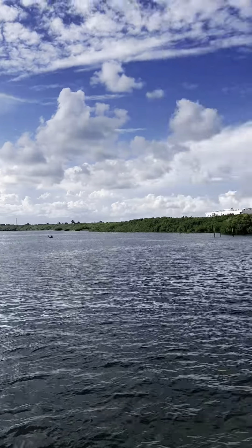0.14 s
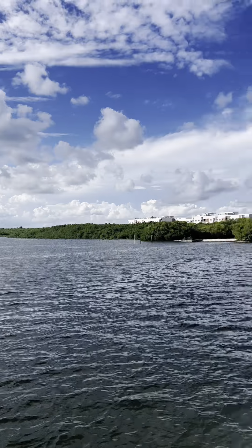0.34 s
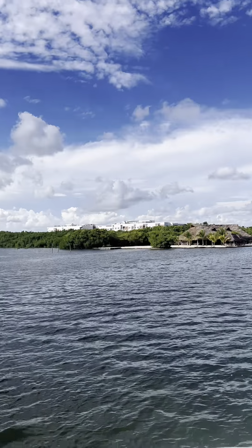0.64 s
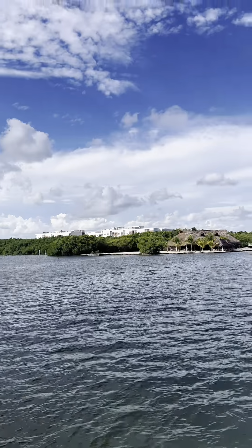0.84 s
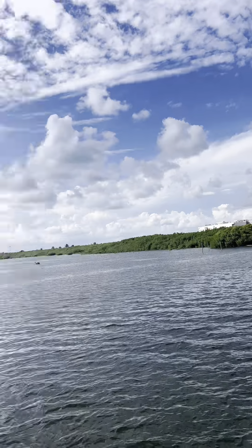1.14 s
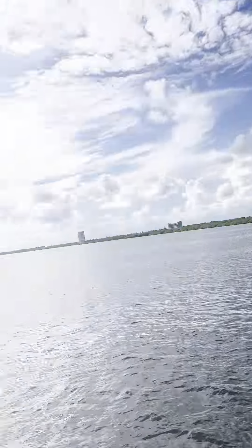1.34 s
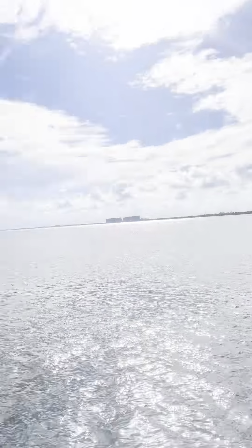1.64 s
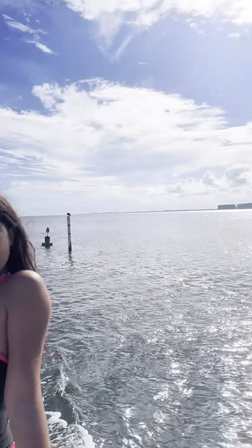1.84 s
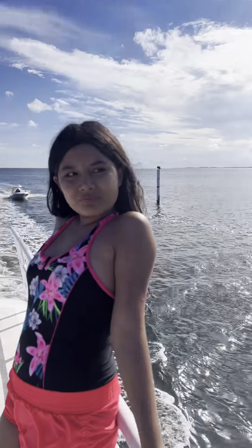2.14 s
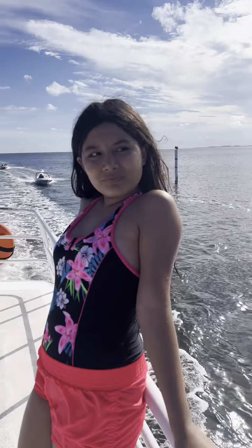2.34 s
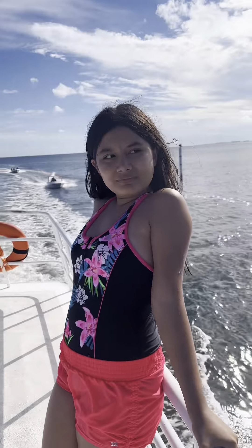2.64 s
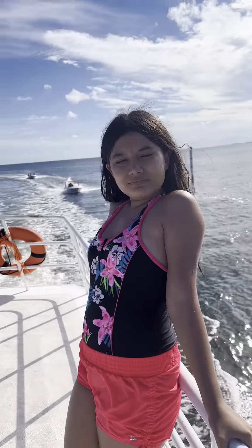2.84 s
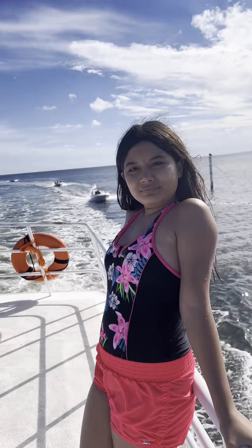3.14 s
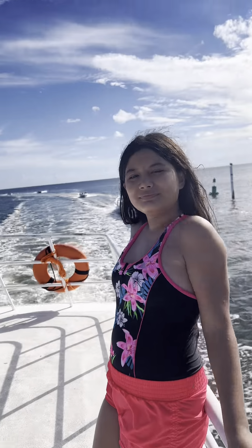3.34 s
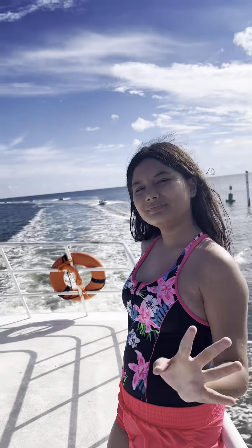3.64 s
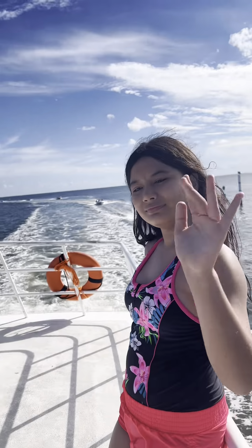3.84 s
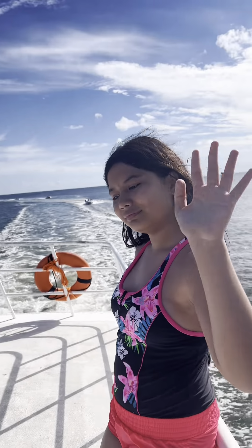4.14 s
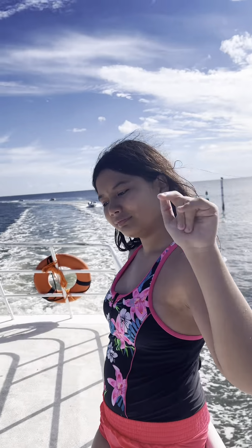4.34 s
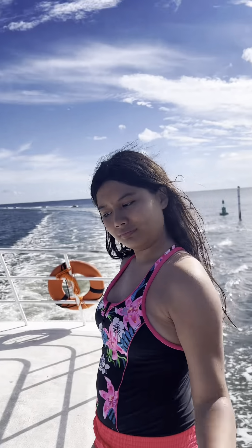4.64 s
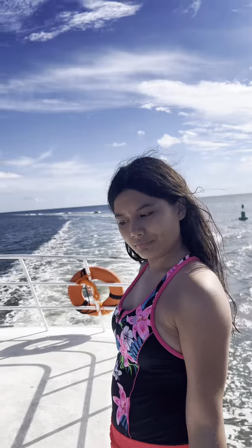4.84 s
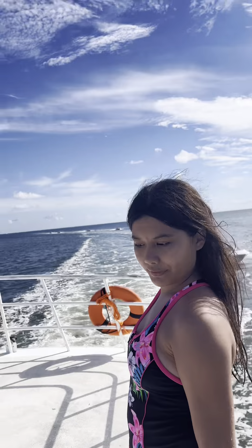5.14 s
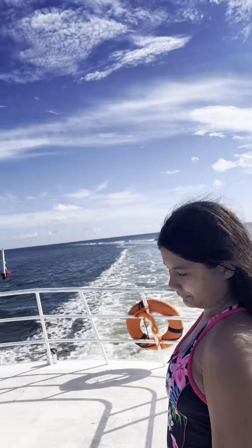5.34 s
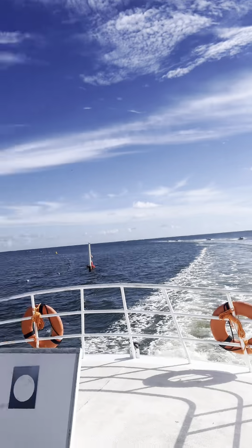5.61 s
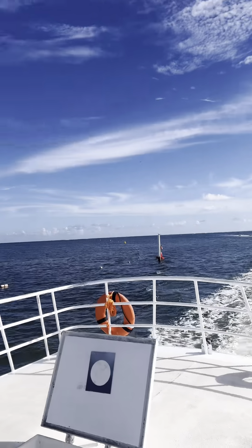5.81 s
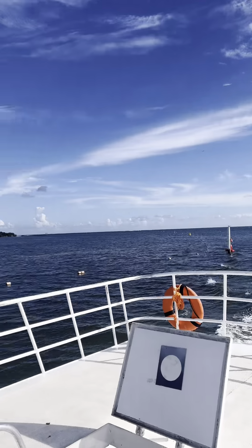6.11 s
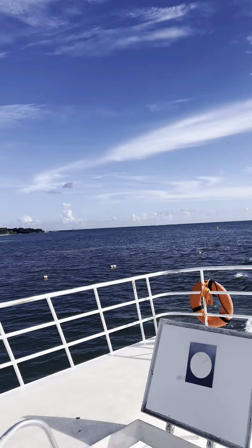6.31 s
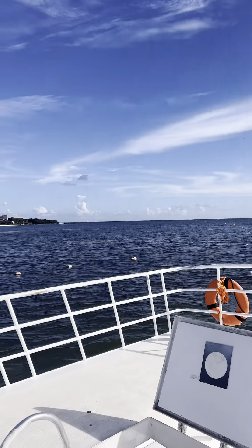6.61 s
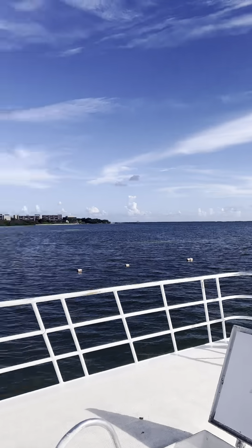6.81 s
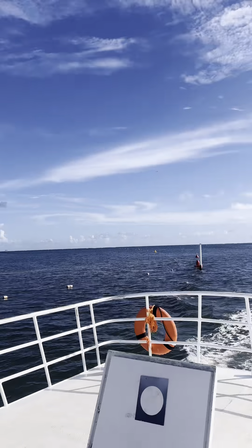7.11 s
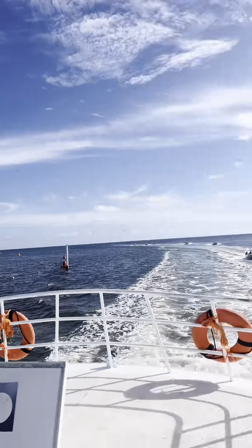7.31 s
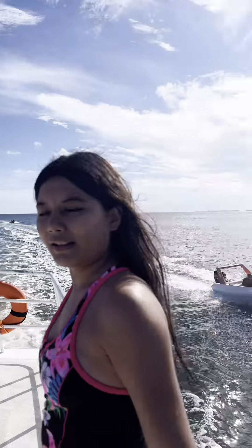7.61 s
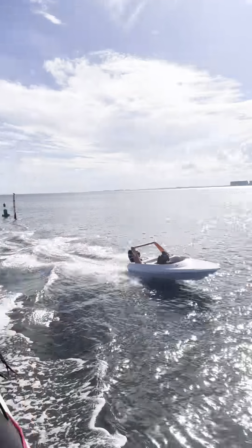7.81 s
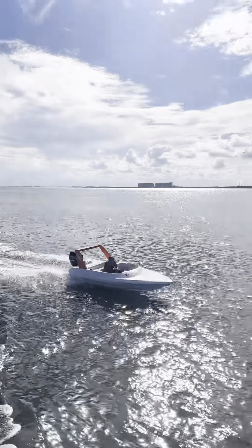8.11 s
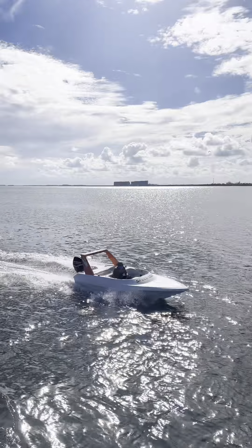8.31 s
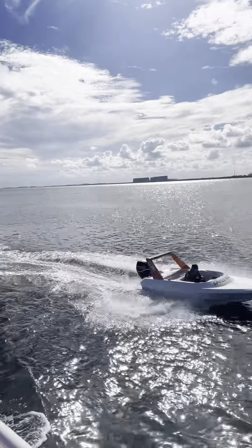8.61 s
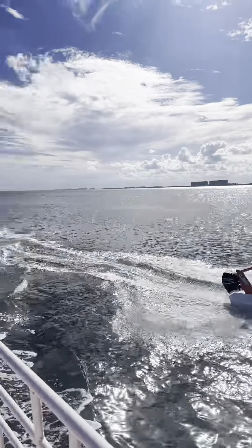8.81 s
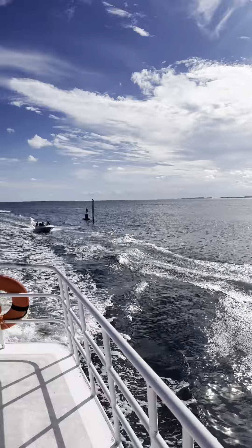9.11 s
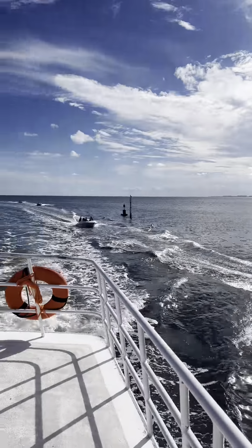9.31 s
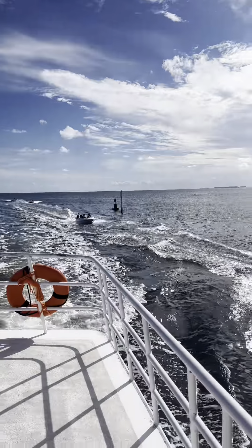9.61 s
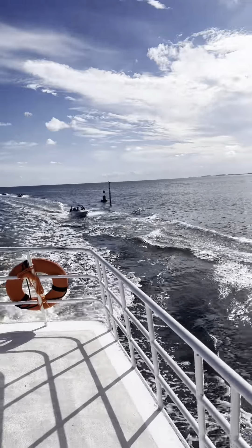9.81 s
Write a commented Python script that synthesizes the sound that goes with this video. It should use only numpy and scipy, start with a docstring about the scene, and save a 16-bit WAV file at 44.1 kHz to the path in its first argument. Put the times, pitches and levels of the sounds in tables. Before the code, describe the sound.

Open deck of a moving boat, heard through a wind-buffeted stereo microphone. Two low engines, almost in step, make a deep throbbing hum that swells and drops unevenly, sometimes abruptly. From 0.4 to 1.2 s a fluttering gust brings a cluster of soft pops; the water is still faint. Around 2 s the churning wake and fine spray rise. Hard low wind thumps hit at 2.5 and 3.4-3.6 s, smaller ones at 4.3-4.9 s, then a run of flutters and pops at 5.2-5.9 s. A splash bursts at 6.6 s, and a strong gust pops at 7.1-7.2 s. From about 7.5 s a small motorboat draws alongside with a rushing drone, slapping through a wave at 8.2 s. Water becomes loud, bright and hissing, and the engines strengthen. A heavy wind pop hits at 9.3 s, with another low gust near 9.9 s.

```python
"""Open deck of a moving boat. Two engines a little apart in speed, summed as pairs of sines, beat together.
The wake churns and sprays astern: shaped noise. Gusts rumble and flutter on the microphone ports: lumpy noise
and short rings, with single eddies popping out. A small motor boat, rush and drone in noise, draws alongside.
The engines swell and sink, at times abruptly, and the water grows louder toward the end."""
import sys
import numpy as np
from scipy import signal
from scipy.io import wavfile
from scipy.ndimage import uniform_filter1d

SR = 44100
rng = np.random.default_rng(int(sys.argv[2]) if len(sys.argv) > 2 else 0)


def transcribe(u):
    """Save the signal u as a 16-bit wav file named by the first command-line argument.

    u: samples, shape (n,) or (channels, n), limited to [-1, 1]; the rate is SR.
    q: integer samples, one column per channel.
    """
    v = np.clip(np.atleast_2d(u).T, -1, 1)
    q = np.round(v * 32767).astype(np.int16)
    wavfile.write(sys.argv[1], SR, q)


N = 439236

# Shaft speeds. The columns are first engine and second engine in Hz.
SHAFT_HZ = (28.79, 29.17)
IN_STEP_S = 5.98   # both shafts pass zero phase here, but for the second engine's lead
ENGINE_WAVER_DB = 2.03
# Tones of the engines. Each row: multiple of shaft speed, gain of first engine in dB, of second in dB.
ENGINE_ORDERS = [(2, 2.5, 4), (3, -11.5, -20.5), (4, -2.5, -3), (6, -7.5, -22), (7, 1, -24),
                 (12, -12, -19.5)]
# Engines as heard. Each row: time in seconds, gain of second order in dB, of third and fourth orders in dB.
ENGINE_GAINS = [(0.0, -12, -12.5), (0.33, -16.5, -12.5), (0.71, -17.5, -16), (0.78, -27, -30),
                (1.33, -17, -26), (1.55, -29, -25), (1.8, -18, -22), (2.1, -15.5, -15.5),
                (2.5, -14.5, -13.5), (2.99, -20, -16.5), (3.54, -18, -14), (3.61, -23.5, -28),
                (4.45, -22.5, -22), (4.8, -19.5, -28), (5.64, -26.5, -30.5), (6.31, -23.5, -27),
                (6.64, -22.5, -17), (6.97, -26, -30), (7.3, -18, -22.5), (7.64, -16.5, -20),
                (7.84, -18, -20.5), (7.9, -22, -7.5), (7.98, -30, -23), (8.4, -19, -16.5),
                (8.96, -15, -11.5), (9.3, -12.5, -16), (9.96, -20, -13.5)]
# Higher engine orders as heard. Each row: time in seconds, gain in dB.
UPPER_ORDER_GAINS = [(0, -31.5), (1.7, -37), (2.2, -27), (3.5, -28.5), (4.2, -35.5), (6, -38.5),
                     (7.6, -35.5), (8, -28), (9.96, -25.5)]
# The second engine hunts a little. Each row: time in seconds, lead in shaft turns.
SECOND_ENGINE_LEAD = [(0.15, -.02), (1.4, -.015), (2.6, .03), (3.9, .04), (5.3, 0), (6.7, -.035), (7.95, 0)]
# Bass balance. Each row: time in seconds, left minus right in dB.
BASS_LEAN = [(0, -2.8), (4.8, -2.4), (5.4, 0)]

# Steady wind on the ports. Each row: time in seconds, then gains in dB of rumble, shared flutter and
# flutter that differs between the ports.
BREEZE = [(0, -29, -43.5, -38), (0.41, -14, -51, -26.5), (0.85, -28.5, -36, -45.5), (1.74, -31.5, -51, -50),
          (2.49, -22.5, -47, -55), (3.15, -25.5, -59, -41), (4.5, -27.5, -41.5, -31),
          (6.05, -29.5, -40.5, -36.5), (6.99, -26.5, -48, -29), (7.3, -32, -73, -38),
          (8.4, -25.5, -39, -42), (9.16, -19, -51, -48), (9.45, -27.5, -62, -22.5), (9.96, -36, -30, -32)]
# Gusts. Each row: peak time, rise and fall in seconds, then the same three gains in dB.
GUSTS = [(0.67, 0.49, 0.15, -12, -16.5, -24), (0.97, 0.22, 0.26, -25, -33, -43),
         (1.19, 0.11, 0.07, -31, -26, -26.5), (1.5, 0.034, 0.13, -16.5, -35.5, -44),
         (2.55, 0.12, 0.078, -13, -36, -47), (2.86, 0.45, 0.3, -15, -34, -36),
         (3.27, 0.14, 0.14, -13.5, -34, -47), (3.38, 0.016, 0.089, -10, -26.5, -32),
         (3.49, 0.12, 0.03, -7.5, -34, -42), (3.546, 0.023, 0.021, -3.5, -40, -23),
         (3.63, 0.15, 0.24, -27, -32.5, -35), (3.96, 0.26, 0.06, -19.5, -34, -32),
         (4.1, 0.11, 0.1, -23.5, -34, -32), (4.3, 0.078, 0.051, -15.5, -33, -33),
         (4.59, 0.068, 0.038, -22.5, -33.5, -39), (4.86, 0.11, 0.13, -15.5, -28, -20.5),
         (5.19, 0.09, 0.077, -30, -31, -37), (5.35, 0.046, 0.18, -46, -48, -29),
         (5.78, 0.72, 0.41, -23.5, -28.5, -49), (6.63, 0.11, 0.77, -24, -32.5, -49),
         (7.08, 0.026, 0.29, -17, -27.5, -38), (7.19, 0.094, 0.048, -24, -16, -42),
         (7.85, 0.61, 1, -16.5, -57, -28), (8.1, 0.15, 0.094, -24, -29.5, -24),
         (9.22, 0.14, 0.31, -9.5, -28.5, -15.5), (9.74, 0.37, 0.1, -17.5, -35, -35),
         (9.88, 0.063, 0.12, -6.5, -21, -11)]
# Wind spectra. Each row: frequency in Hz, relative density in dB per Hz.
RUMBLE_SPECTRUM = [(30, -35), (45, -13), (80, -4.5), (150, -8), (250, -11.5), (400, -20), (700, -43.5)]
FLUTTER_SPECTRUM = [(150, -33), (300, -1), (500, 15), (800, -3.5), (1200, -15.5), (2000, -48), (3000, -63)]
APART_SPECTRUM = [(80, -13), (180, -1), (300, 3.5), (600, 1), (900, -10), (1400, -27), (2500, -27)]
# Ring added to the differing flutter. Each row: time in seconds, gain in dB.
APART_RING_GAINS = [(0, 5), (1.15, -6), (1.3, 17), (1.6, 13), (2.4, 17.5), (3.1, 15.5), (3.4, 7),
                    (4.4, 3.5), (5.0, -1.5), (5.4, -25), (6.95, 10), (7.1, -4)]
APART_RING_HZ, APART_RING_WIDTH_HZ = 820, 260

# The wake. Each row: time in seconds, churn gain in dB, spray gain in dB.
WAKE = [(0.0, -53, -58.5), (0.69, -49.5, -61), (1.14, -49, -58), (2.25, -41.5, -49), (3.16, -41.5, -49.5),
        (3.66, -41.5, -53.5), (4.05, -39, -51.5), (4.94, -42, -51.5), (5.85, -43, -51),
        (6.38, -39.5, -44.5), (6.57, -41.5, -49), (7.1, -40, -47.5), (7.52, -39.5, -42.5),
        (7.68, -38.5, -45.5), (8.3, -35, -37), (8.85, -36.5, -37), (9.96, -33.5, -39)]
# Waves splash up. Each row: peak time, rise and fall in seconds, churn gain in dB, spray gain in dB.
SPLASHES = [(3.69, 0.038, 0.079, -36, -55), (5.38, 0.76, 0.9, -39, -47), (5.96, .2, 0.49, -41, -49),
            (6.625, 0.04, 0.35, -32, -42.5), (7.19, 0.042, 0.45, -38.5, -61),
            (8.07, 0.035, 0.16, -34.5, -45), (8.235, 0.14, 0.043, -32, -34)]
# Water spectra, WIDE for the left-right part. Each row: frequency in Hz, relative density in dB per Hz.
CHURN_SPECTRUM = [(400, -11), (600, -1), (900, 3), (1300, -4), (1700, -4), (2500, -10), (3200, -10),
                  (4500, -20), (5600, -37)]
CHURN_WIDE_SPECTRUM = [(600, 13.5), (900, 0), (1300, 2.5), (1900, -25), (2600, 2.5), (4000, -24), (5000, 0),
                       (6000, -51)]
SPRAY_SPECTRUM = [(4400, -9), (5600, -3), (7500, -5.5), (10000, -12), (12000, -13), (14500, -10)]
SPRAY_WIDE_SPECTRUM = [(7000, -26), (8500, -12), (10500, 2), (12300, 0), (15000, 3), (18500, -11)]
CHURN_DB, CHURN_WIDE_DB, SPRAY_WIDE_DB = 3.5, -1.5, -0.5   # added to the gains above
DIP_HZ, DIP_WIDTH_HZ, DIP_SHARE = 4990, 580, 0.52   # the microphone hears less of the water here

# Steady faint hiss. Each row: frequency in Hz, relative density in dB per Hz.
HISS_SPECTRUM = [(3000, -10), (4000, -12), (4800, 4.5), (5600, -11.5), (7000, -19)]
HISS_DB = -54.5

# Strong eddies. Each row: start in seconds, gain of the main puff in dB, pitch in Hz.
EDDIES = [(0.383, -18, 604), (0.497, -18.5, 942), (0.525, -16, 587), (0.557, -9, 860), (0.591, -13, 800),
          (0.644, -16, 900), (0.661, -14.5, 955), (0.721, -11, 940), (0.725, -15.5, 935),
          (0.786, -14.5, 700), (0.812, -14, 895), (0.852, -13.5, 810), (0.915, -21, 850),
          (1.186, -12.5, 940), (2.532, -10, 444), (3.383, -10, 500), (3.39, -12, 1090), (3.393, -11, 690),
          (3.452, -11, 700), (3.499, -10.5, 745), (3.539, -4, 382), (3.655, -17, 810), (4.287, -12.5, 624),
          (4.324, -12.5, 554), (4.572, -11, 220), (4.836, -15, 455), (4.878, -10.5, 520), (5.166, -12, 514),
          (5.191, -9, 665), (5.217, -10, 543), (5.355, -14.5, 546), (5.487, -24, 640), (5.543, -18, 553),
          (5.6, -14, 850), (5.662, -11, 695), (5.694, -14, 600), (5.735, -10.5, 650), (5.774, -9, 550),
          (5.817, -12, 600), (5.835, -12, 650), (7.066, -17, 596), (7.143, -16, 503), (7.176, -7, 620),
          (7.197, -2, 720), (7.242, -17, 600), (8.087, -17, 595), (8.097, -8, 375), (8.211, -10, 920),
          (8.316, -14, 620), (8.323, -9.5, 300), (9.241, -0.5, 744)]
# The sharp front has its full share from FULL_FRONT_HZ up, less below; the push is dull.
FRONT_SHARE, FULL_FRONT_HZ, PUSH_SHARE = 0.3, 950, 0.7

# A small motor boat alongside. Each row: time in seconds, gain in dB; the first gain holds before.
LAUNCH_GAINS = [(7.3, -61), (7.9, -44), (9.0, -39), (9.96, -46)]
# Its rush and its slap. Each row: frequency in Hz, relative density in dB per Hz.
LAUNCH_RUSH_SPECTRUM = [(500, 11), (800, 3.5), (1300, 4.5), (2200, -2), (2800, -6)]
SLAP_SPECTRUM = [(500, 4), (1000, 12), (1800, 11), (2500, 1), (3200, -8)]
# Its droning bands. Each row: frequency in Hz, width in Hz, gain relative to the rush in dB.
LAUNCH_DRONES = [(950, 90, -6), (2180, 70, -3)]
# It slaps through a wave. The columns are peak time, rise and fall in seconds, gain in dB.
SLAP = (8.225, 0.05, 0.09, -24)

SUPPRESS_KNEE = 2.5   # how abruptly the wind suppressor closes
CENTRE_TOP_HZ, WIDE_TOP_HZ = 12550, 15750


def from_db(db):
    """Amplitude gain of a level in dB."""
    return np.exp(np.asarray(db) * (np.log(10) / 20))


def rms_one(x):
    """Scaled to rms 1."""
    return x / np.sqrt(np.mean(x ** 2) + 1e-20)


def in_time(rows):
    """Columns of a curve, sample by sample."""
    s, *columns = np.transpose(rows)
    return [np.interp(np.arange(N) / SR, s, c) for c in columns]


def swells(steady, events):
    """Gains, one per column: a steady level plus events that gain 20 dB over their rise, lose it over their fall."""
    t, gains = np.arange(N) / SR, from_db(in_time(steady))
    for s, rise_s, fall_s, *levels_db in events:
        near = slice(max(0, int((s - 2 * rise_s) * SR)), int((s + 2 * fall_s) * SR))
        away = np.where(t[near] < s, (s - t[near]) / rise_s, (t[near] - s) / fall_s)
        event_gains = from_db(np.array(levels_db)[:, None] - 20 * away)
        gains[:, near] = np.hypot(gains[:, near], event_gains)
    return gains


def drift(rate_hz):
    """Slow chance: noise through a double one-pole low-pass, run in; rms 1."""
    step, run_in = 40, 2000   # computed at every 40th sample
    r = np.exp(-2 * np.pi * rate_hz * step / SR)
    noise = rng.standard_normal(N // step + run_in + 2)
    slow = signal.lfilter([1], [1, -2 * r, r * r], noise)[run_in:]
    return np.interp(np.arange(N) / step, np.arange(len(slow)), rms_one(slow))


def resonance(x, hz, width_hz):
    """Two-pole band-pass with gain about 1 on top."""
    r = np.exp(-np.pi * width_hz / SR)
    zeros = (1 - r * r) / 2 * np.array([1, 0, -1])
    poles = [1, -2 * r * np.cos(2 * np.pi * hz / SR), r * r]
    return signal.lfilter(zeros, poles, x)


def banded_noise(spectrum, lump_db, lump_hz, own_db, own_tilt=0):
    """Third-octave bands swell together in lumps and flicker alone, more in low bands with own_tilt; rms 1."""
    hz, db = np.transpose(spectrum)
    edges = 25 * 2 ** (np.arange(30) / 3)
    white = rng.standard_normal((2, N))   # neighbouring bands take different noise
    lumps_db = lump_db * drift(lump_hz)
    out = 0
    for k, (low, high) in enumerate(zip(edges, edges[1:])):
        centre_hz = np.sqrt(low * high)
        if hz[0] <= centre_hz <= hz[-1]:
            band_filter = signal.butter(2, [low, high], "band", fs=SR, output="sos")
            band = signal.sosfilt(band_filter, white[k % 2])
            band_db = np.interp(np.log(centre_hz), np.log(hz), db)
            flicker_db = own_db * (1000 / centre_hz) ** own_tilt * drift(10)
            out = out + from_db(band_db + flicker_db) * band
    return rms_one(out * from_db(lumps_db))


def stereo(centre, apart):
    """Left and right from what the ports share and what they hear in opposite sense."""
    return np.array([centre + apart, centre - apart])


def engines():
    """Each order is a pair of close tones, one an engine, so each order beats at its own rate."""
    second_db, middle_db = in_time(ENGINE_GAINS)
    upper_db, = in_time(UPPER_ORDER_GAINS)
    lead_turns, = in_time(SECOND_ENGINE_LEAD)
    t = np.arange(N) / SR - IN_STEP_S
    turns = (SHAFT_HZ[0] * t, SHAFT_HZ[1] * t + lead_turns)
    out = 0
    for order, *levels_db in ENGINE_ORDERS:
        pair = sum(from_db(db) * np.sin(2 * np.pi * order * turned) for db, turned in zip(levels_db, turns))
        if order == 2:
            heard_db = second_db
        else:
            heard_db = middle_db if order <= 4 else upper_db
        out = out + from_db(heard_db + ENGINE_WAVER_DB * drift(9.2)) * pair
    return out


def small_eddies(per_s, spread_db, tilt):
    """Countless lesser eddies come at random, in clumps, each a broad short ring; rms 1."""
    sizes = from_db(spread_db * np.minimum(rng.exponential(1, N), 3)) * rng.choice([-1, 1], N)
    chance = per_s * from_db(4.0 * drift(20)) / SR
    born = sizes * (rng.random(N) < chance)
    pitches_hz, dealt = np.geomspace(260, 850, 8), rng.integers(0, 8, N)
    rings = 0
    for k, hz in enumerate(pitches_hz):
        ring = resonance(born * (dealt == k) + 1e-18, hz, 0.49 * hz)
        rings = rings + resonance(ring, hz, 0.47 * hz) * hz ** tilt
    soft = signal.butter(4, 1900, fs=SR, output="sos")   # air has no hard edge
    return rms_one(signal.sosfilt(soft, rings))


def wind():
    """Turbulence on the ports: shared rumble, shared lumpy flutter and flutter that differs between the ports."""
    rumble_gain, flutter_gain, apart_gain = swells(BREEZE, GUSTS)
    rumble = rumble_gain * banded_noise(RUMBLE_SPECTRUM, lump_db=3.0, lump_hz=32, own_db=2.0)
    flutter = from_db(-3.0) * banded_noise(FLUTTER_SPECTRUM, lump_db=3.5, lump_hz=51, own_db=3.0)
    flutter = flutter_gain * (flutter + small_eddies(per_s=220, spread_db=2.5, tilt=-1.14))
    apart = banded_noise(APART_SPECTRUM, lump_db=2.5, lump_hz=63, own_db=5.5)
    apart = apart_gain * (apart + from_db(-7) * small_eddies(per_s=40, spread_db=3.5, tilt=-0.87))
    ring_db, = in_time(APART_RING_GAINS)
    apart = apart + from_db(ring_db) * resonance(apart, APART_RING_HZ, APART_RING_WIDTH_HZ)
    return rumble, stereo(flutter, apart)


def wake():
    """Churning water is a patchy rush, a little to the left; spray is a fine wide hiss above it."""
    churn_gain, spray_gain = swells(WAKE, SPLASHES)
    churn = banded_noise(CHURN_SPECTRUM, lump_db=0.97, lump_hz=16.6, own_db=1.2, own_tilt=0.6)
    churn = churn_gain * from_db(CHURN_DB) * churn
    churn = churn + .5 * resonance(churn, 1330, 130)   # a hollow note in the rush
    churn_wide = banded_noise(CHURN_WIDE_SPECTRUM, lump_db=-1.0, lump_hz=13, own_db=0.0)
    churn_wide = churn_gain * from_db(CHURN_WIDE_DB) * churn_wide
    spray = spray_gain * banded_noise(SPRAY_SPECTRUM, lump_db=1.0, lump_hz=9.2, own_db=0.0)
    spray_wide = banded_noise(SPRAY_WIDE_SPECTRUM, lump_db=-1.3, lump_hz=9, own_db=2.5)
    spray_wide = spray_gain * from_db(SPRAY_WIDE_DB) * spray_wide
    centre = churn + spray
    centre = centre - DIP_SHARE * resonance(centre, DIP_HZ, DIP_WIDTH_HZ)
    return stereo(centre, churn_wide + spray_wide + 0.15 * churn)


def hiss():
    """Steady faint noise, independent at each port."""
    return [from_db(HISS_DB) * banded_noise(HISS_SPECTRUM, lump_db=0.2, lump_hz=9, own_db=2.5)
            for port in range(2)]


def eddies():
    """A strong eddy is a cycle or two under a short bell-shaped swell, with a sharp front and a dull push."""
    out, half_turns = np.zeros(N), rng.uniform(-0.94, 1, len(EDDIES))
    for (s, db, hz), half_turn in zip(EDDIES, half_turns):
        phase, width_s = np.pi * half_turn, 0.41 / hz
        t = np.arange(int(6 * width_s * SR)) / SR
        at = round(s * SR)

        def bell(centre, spread):   # both in widths
            return np.exp(-.5 * ((t - centre * width_s) / (spread * width_s)) ** 2)

        front_share = FRONT_SHARE * min(hz / FULL_FRONT_HZ, 1) ** 5
        puff = bell(2.75, 1) * np.cos(2 * np.pi * hz * t + phase)
        puff += front_share * bell(2.0, 0.85) * np.cos(2 * np.pi * 1.7 * hz * t)
        puff += PUSH_SHARE * bell(2.6, 0.69) * np.cos(2 * np.pi * 0.39 * hz * t + phase)
        out[at:at + len(t)] += from_db(db) * puff[:N - at]
    return out


def launch():
    """Hull rush with two narrow droning bands and one slap through a wave, on the left."""
    level_db, = in_time(LAUNCH_GAINS)
    sound = banded_noise(LAUNCH_RUSH_SPECTRUM, lump_db=0.5, lump_hz=12, own_db=0.7)
    for hz, width_hz, db in LAUNCH_DRONES:
        drone = rms_one(resonance(rng.standard_normal(N), hz, width_hz))
        sound = sound + from_db(db + 0.87 * drift(5.6)) * drone
    slap_gain, = swells([(0, -90)], [SLAP])
    slap = slap_gain * banded_noise(SLAP_SPECTRUM, lump_db=1.5, lump_hz=40, own_db=1.0)
    sound = from_db(level_db) * sound + slap
    return stereo(sound, 0.23 * sound)


def scene():
    """All sources at the two ports; the bass is a little stronger on the right at first, then central."""
    rumble, flutter = wind()
    lean_db, = in_time(BASS_LEAN)
    bass = (engines() + rumble) * from_db([lean_db / 2, -lean_db / 2])
    return bass + flutter + wake() + hiss() + eddies() + launch()


def suppress_wind(centre, wide):
    """Band by band, the shared sound is turned down while the ports disagree more than they agree."""
    for hz in (455, 558, 640, 801, 920, 1057):
        band = resonance(centre, hz, 0.13 * hz)
        band_wide = resonance(wide, hz, 0.14 * hz)
        agree = uniform_filter1d(band ** 2, size=500) + 1e-12   # quick, so a lone pop opens it
        differ = uniform_filter1d(band_wide ** 2, size=1300) + 1e-12
        centre = centre - band / (1 + np.abs(2.0 * agree / differ) ** SUPPRESS_KNEE)
    return centre


def record(dry):
    """Peaks are rounded, wind is suppressed, the top is cut: lower in what both sides share than in the wide part."""
    left, right = .98 * np.tanh(dry / .98)
    centre, wide = (left + right) / 2, (left - right) / 2
    centre_top = signal.ellip(10, .5, 75, CENTRE_TOP_HZ, fs=SR, output="sos")
    wide_top = signal.ellip(10, .5, 75, WIDE_TOP_HZ, fs=SR, output="sos")
    centre = signal.sosfilt(centre_top, suppress_wind(centre, wide))
    return stereo(centre, signal.sosfilt(wide_top, wide))


dry = scene()
out = record(dry)
transcribe(out)
```